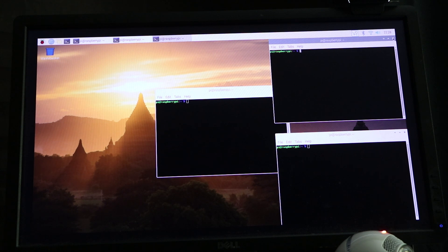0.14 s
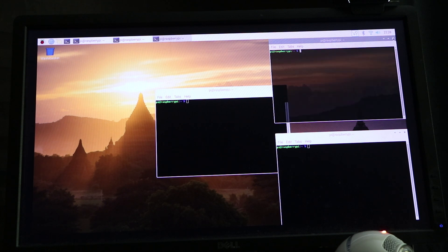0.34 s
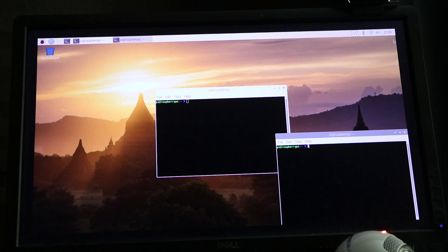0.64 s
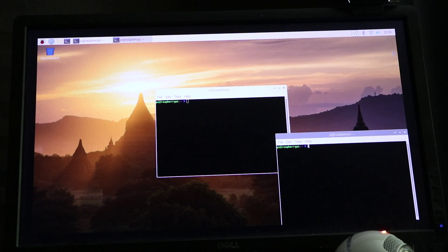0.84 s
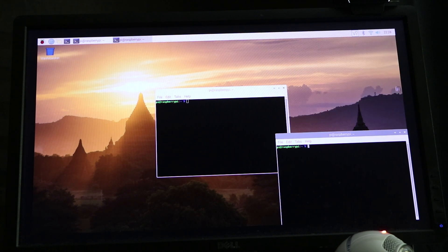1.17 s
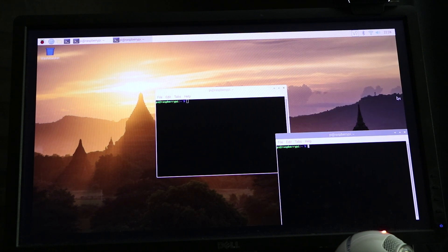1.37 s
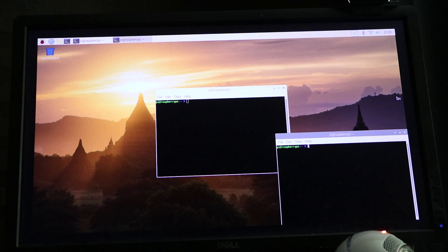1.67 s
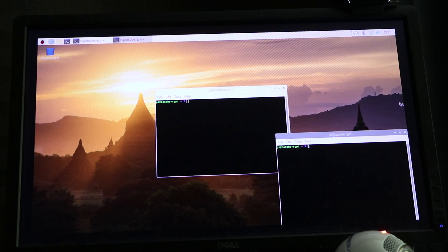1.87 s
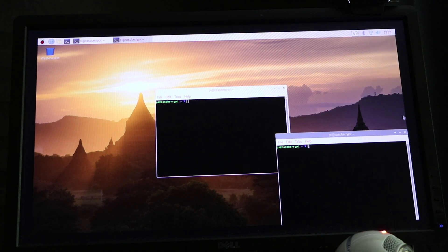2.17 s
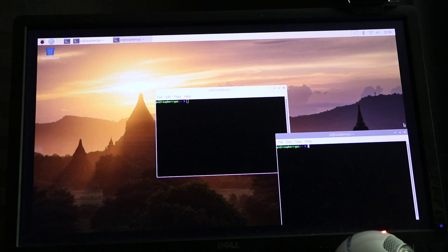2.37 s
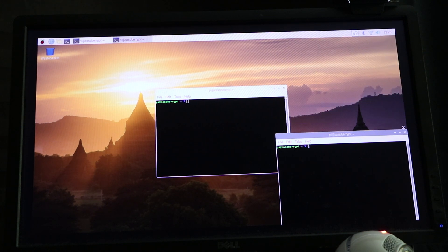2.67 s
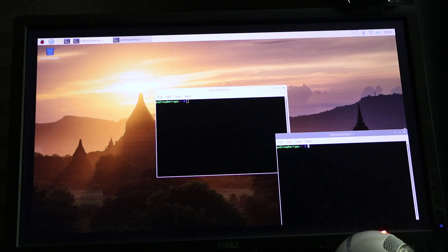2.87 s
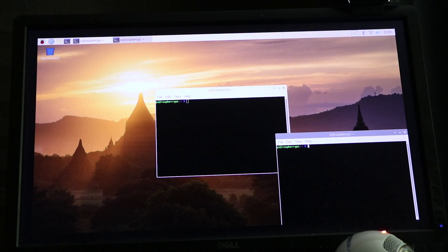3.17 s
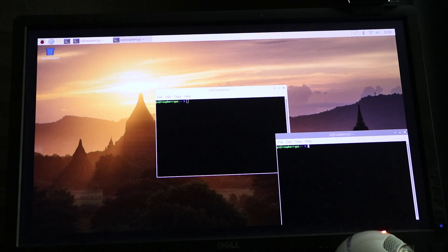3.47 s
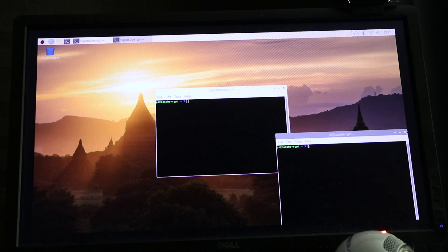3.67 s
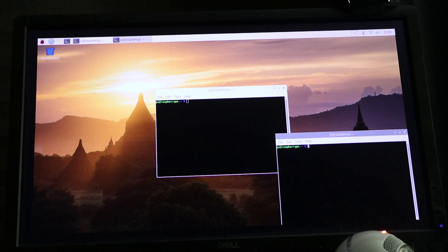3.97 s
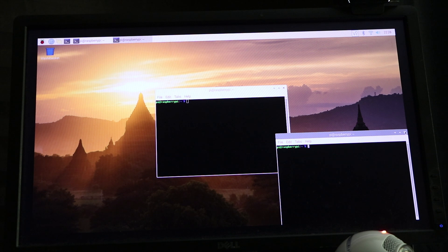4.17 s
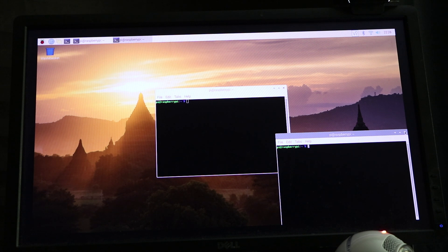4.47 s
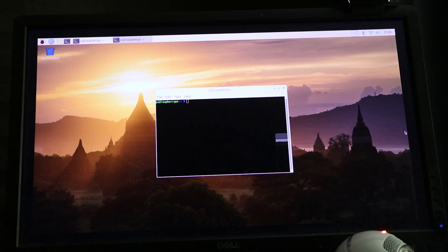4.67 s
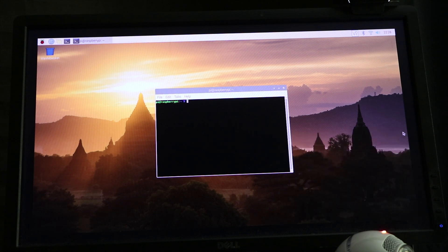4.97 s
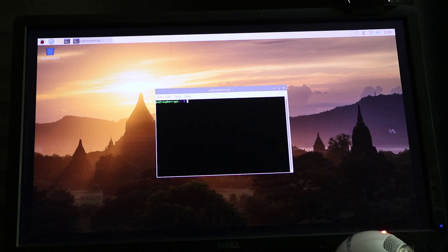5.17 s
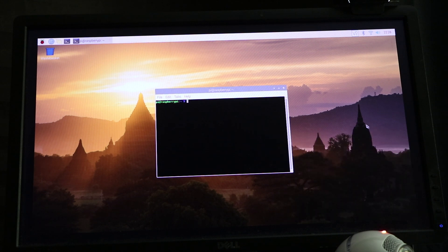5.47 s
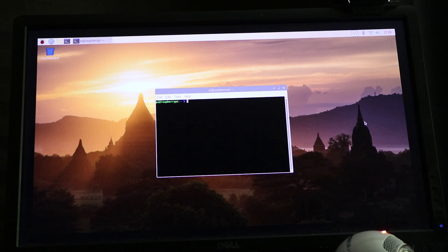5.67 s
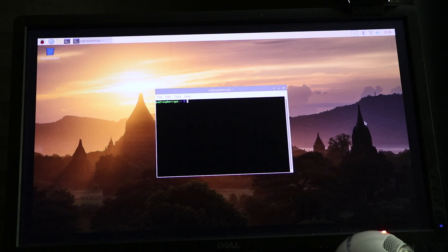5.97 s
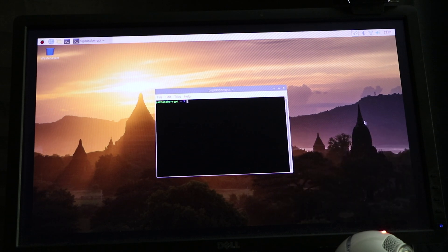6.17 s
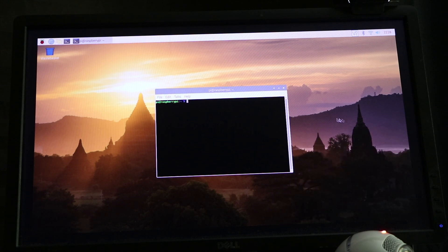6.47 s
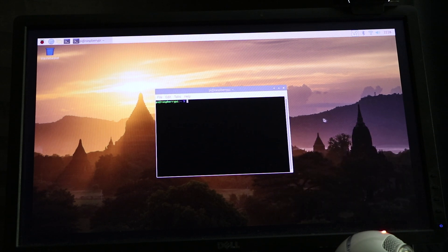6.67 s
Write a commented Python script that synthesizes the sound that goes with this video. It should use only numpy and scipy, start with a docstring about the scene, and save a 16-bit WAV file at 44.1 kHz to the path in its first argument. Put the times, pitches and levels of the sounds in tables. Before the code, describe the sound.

A computer mouse clicks, slides and clatters lightly on a desk, over a soft fan hum in a quiet room.

```python
"""A desk in a quiet room, with a computer mouse a little right of the microphones.
Its button is pressed and let go twice, each snap ringing the switch and button. In between, the mouse
slides on rubbing feet, is lifted and clatters back: the desk top thuds, the hollow shell clacks and its
edge ticks. Later it slides and bumps again. A fan hums softly throughout, over a faint, deep rumble."""
import sys
import numpy as np
from scipy import signal
from scipy.fft import rfft, irfft
from scipy.io import wavfile
from scipy.ndimage import uniform_filter1d

SR = 44100
rng = np.random.default_rng(int(sys.argv[2]) if len(sys.argv) > 2 else 0)


def bounce(signal):
    """Save signal as a 16-bit WAV file at the path given by the first command-line argument."""
    frames = np.transpose(np.atleast_2d(signal))
    limited = np.clip(frames, -1, 1)
    pcm = np.round(limited * 32767).astype(np.int16)
    wavfile.write(sys.argv[1], SR, pcm)


N = 300938


def amp(db):
    """Decibels to gain."""
    return 10 ** (np.asarray(db) / 20)


def unit_rms(x):
    """Scales to rms 1."""
    return x / np.sqrt(np.mean(x ** 2) + 1e-20)


def unit_hit(x):
    """Scales a hit to the energy of 10 ms at rms 1."""
    return unit_rms(x) * np.sqrt(0.01 * SR / x.shape[-1])


def curve_at(points, hz):
    """Reads (Hz, value) points on a log-frequency axis."""
    point_hz, value = np.transpose(points)
    return np.interp(np.log(hz + 1), np.log(point_hz), value)


def add(mix, start_s, sound):
    """Lays a sound into the mix."""
    part = mix[..., max(round(start_s * SR), 0):][..., :sound.shape[-1]]
    part += sound[..., :part.shape[-1]]


def colour(x, spectrum, size=4096):
    """Minimum-phase EQ through (Hz, dB) points: nothing sounds before the attack."""
    log_gain = np.log(amp(curve_at(spectrum, abs(np.fft.fftfreq(size, 1 / SR)))))
    response = np.exp(np.conj(signal.hilbert(log_gain)))
    taps = np.fft.ifft(response).real[:size // 2]
    return signal.fftconvolve(x, taps[None], axes=1)[:, :x.shape[1]]


def arches(rows):
    """Turns each row of start, length and dB into a half-sine swell from 0 to 1 and back, and its dB."""
    t = np.arange(N) / SR
    return [(np.sin(np.pi * np.clip((t - start) / length, 0, 1)).clip(0), db)
            for start, length, db in rows]


def diffuse(size):
    """Flat noise at two close microphones: alike in the low mids, unrelated in the treble."""
    # Each row: frequency in Hz, correlation of left and right.
    likeness = [(30, -0.05), (130, 0.97), (290, 0.82), (640, 0.82), (1400, 0.31), (2600, 0), (16000, 0)]
    hz = np.fft.rfftfreq(size, 1 / SR)
    left, unrelated = np.exp(2j * np.pi * rng.random((2, len(hz))))
    shared = np.clip(curve_at(likeness, hz), -1, 1)
    right = shared * left + np.sqrt(1 - shared ** 2) * unrelated
    return unit_rms(irfft(np.array([left, right]), size))


def rumble(floor_db=-78):
    """A faint, deep bed of noise that swells now and then."""
    # Each row: frequency in Hz, gain in dB.
    rumble_eq = [(15, -22), (30, -10), (42, -4), (60, -12), (120, -48), (400, -68)]
    # Each row: start in seconds, length in seconds, peak level in dB.
    swells = [(.2, .45, -67), (2.95, .35, -64), (3.6, 0.86, -62)]
    level = amp(floor_db) + sum(amp(db) * arch for arch, db in arches(swells))
    return unit_rms(colour(diffuse(N), rumble_eq, size=16384)) * level


def fan(air_db=-49, waver_hz=5, left_db=0.3, right_db=-0.97):
    """A fan's steady rush of air, with a few faint, wavering tones."""
    # Each row: frequency in Hz, gain in dB.
    air_eq = [(25, -13.5), (70, -10), (140, -1), (230, -3), (330, -3.5), (420, -3), (750, -6.5),
              (950, -8.5), (1300, -11), (2000, -19.5), (3200, -23), (4900, -30), (6800, -26),
              (10400, -26.5), (16000, -36.5)]
    # Each row: pitch in Hz, level in dB.
    tones = [(226, -63), (296, -65), (420, -63), (737.5, -60), (10492, -100)]
    out = amp(air_db) * unit_rms(colour(diffuse(N), air_eq))
    for hz, db in tones:
        drift = waver_hz * unit_rms(uniform_filter1d(rng.standard_normal(N), size=2000))
        out += amp(db) * np.sqrt(2) * np.sin(2 * np.pi * np.cumsum(hz + drift) / SR)
    return out * amp([[left_db], [right_db]])


def reverb_tail(build_s=0.0057, size=26000):
    """The room's diffuse tail builds quickly and dies away band by band."""
    # Each row: frequency in Hz, seconds to fall 60 dB.
    decay_times = [(100, 0.15), (300, 0.39), (1000, 0.3), (3000, 0.26), (8000, 0.21), (15000, 0.24)]
    hz, t, bands = signal.stft(diffuse(size), SR, nperseg=256)
    decay = amp(-60 * t / curve_at(decay_times, hz)[:, None])
    tail = signal.istft(bands * decay, SR, nperseg=256)[1]
    tail *= 1 - np.exp(-(np.arange(tail.shape[1]) / SR / build_s) ** 2)
    return tail / np.linalg.norm(tail[0])


def room(dry, echo_db, wet_db=-6, tails=3, crossfade_hz=23):
    """Direct sound, echoes off nearby surfaces and a short tail whose paths change from blow to blow."""
    # Each row: delay in seconds, left gain, right gain.
    echoes = [(0.011, .22, 0.12), (0.0053, 0.11, .16), (0.0119, 0.22, 0.2), (0.0118, 0.27, 0.11)]
    out = dry.copy()
    for delay, left, right in echoes:
        add(out, delay, amp(echo_db) * np.array([[left], [right]]) * dry[1])
    turns = crossfade_hz * np.arange(N) / SR
    for k in range(tails):
        send = np.sqrt(2 / tails) * np.cos(np.pi * (turns + k / tails))  # equal-power crossfade
        out += amp(wet_db) * signal.fftconvolve(dry[1:] * send, reverb_tail(), axes=1)[:, :N]
    return out


def from_the_right(x, lag_s=0.00019):
    """Sound reaches the left microphone later, its treble shaded by the microphones' housing."""
    # Each row: frequency in Hz, left minus right in dB.
    shadow = [(100, -1.5), (380, 2.5), (1200, 0.5), (2400, -4), (4400, -4), (15000, -2)]
    hz = np.fft.rfftfreq(N, 1 / SR)
    balance = amp(curve_at(shadow, hz) / 2)
    left = balance * np.exp(-2j * np.pi * hz * lag_s)
    return irfft(rfft(x) * np.array([left, 1 / balance]), N)


def slide(speed_power=0.97, grain_db=1.0, fizz_db=-5, fizz_growth=1.5, brisk_db=-54):
    """The hand pushes the mouse: tiny slips of its feet sound desk and shell; brisk strokes add fizz."""
    # Each row: start in seconds, length in seconds, rub level at full speed in dB.
    strokes = [(.6, .62, -49.5), (1.09, 0.27, -58), (5.02, 0.45, -55.5), (5.59, 0.16, -57.5),
               (6.02, 0.28, -60), (6.26, 0.44, -51), (6.66, 0.16, -54.5)]
    # The low rub and the bright fizz. Each row: frequency in Hz, gain in dB.
    rub_eq = [(60, -14), (150, 1), (300, 9), (460, 13.5), (650, 1), (1400, 3), (2200, 0), (3100, 0.5),
              (3800, -4.5), (4800, -19), (8000, -17), (16000, -25)]
    fizz_eq = [(1000, -25), (2500, 9), (4000, 5), (5200, 0), (7500, 2), (10000, -0.5), (12500, -6.5),
               (16000, -12)]
    rub_level = sum(amp(db) * speed ** speed_power for speed, db in arches(strokes))
    fizz_level = amp(brisk_db + fizz_db) * (rub_level / amp(brisk_db)) ** fizz_growth
    grain = amp(grain_db * unit_rms(uniform_filter1d(rng.standard_normal(N), size=120)))
    rub = unit_rms(colour(diffuse(N) * grain, rub_eq))
    fizz = unit_rms(colour(diffuse(N) * grain, fizz_eq))
    return rub * rub_level + fizz * fizz_level


def burst(t60, scatter, rightward_db=0, size=8192):
    """A sharp impulse, which can lean to the right, followed by a dense, dying shudder."""
    t = np.arange(size) / SR
    shudder = unit_hit(diffuse(size) * amp(-60 * t / t60))
    impulse = (t == 0) * amp([[-rightward_db], [0]])
    return unit_hit(impulse) + scatter * shudder


def softened(spectrum, corner_hz):
    """A contact of finite length dulls a spectrum above its corner."""
    return [(hz, db - 10 * np.log10(1 + (hz / corner_hz) ** 4)) for hz, db in spectrum]


def touches(rebounds=5, gap_s=0.0028, unevenness=0.3, rebound_db=-4):
    """The mouse lands; some landings rattle from foot to foot, fading and rocking the desk either way."""
    # Each row: start in seconds, strength in dB, hardness as a corner in Hz, tick strength in dB,
    # tick corner in Hz, seconds for the rattle to fall 20 dB and stop (zero or less: no rattle).
    landings = [(1.2417, -39, 630, -54, 11000, -0.03), (1.258, -37.5, 430, -63.5, 9000, -0.2),
                (1.69, -31.5, 1720, -37.5, 6000, 0.55), (1.6976, -31, 1400, -37, 8000, -0.08),
                (1.7055, -24.5, 795, -35, 12000, -0.04), (1.7124, -18, 930, -25, 16000, 0),
                (1.7176, -22.5, 930, -36, 12000, -0.28), (1.797, -24.5, 840, -27, 5950, -0.09),
                (1.8007, -20.5, 660, -42, 10000, -0.02), (1.8031, -21.5, 700, -50, 8000, 0.05),
                (5.255, -42, 380, -72, 8000, -0.6), (5.9834, -36.5, 670, -43, 5000, .005),
                (5.989, -27.5, 386, -51, 2580, 0.04), (6.52, -36, 470, -63, 6000, -0.1),
                (6.5594, -44, 398, -45.5, 16000, .002), (6.582, -36.5, 350, -75, 8000, -0.1),
                (6.799, -42, 414, -74, 8000, -0.1)]
    for start, db, hard_hz, tick_db, tick_hz, rattle_s in landings:
        yield start, 1, db, hard_hz, tick_db, tick_hz
        delays = np.cumsum(gap_s * np.exp(unevenness * rng.standard_normal(rebounds)))
        for delay, sign in zip(delays, rng.choice([-1, 1], rebounds)):
            if delay < rattle_s:
                fade_db = rebound_db - 20 * delay / rattle_s
                yield start + delay, sign, db + fade_db, hard_hz, tick_db + fade_db, tick_hz


def knocks(ring_db=-5.5, ring_left_db=2.5, firm_hz=700, clack_db_per_octave=6.5, size=22050):
    """Each touch thuds and rings in the desk top, clacks in the hollow shell and ticks at its edge."""
    # The desk top's modes. Each row: pitch in Hz, level in dB, seconds to fall 60 dB.
    desk = [(113.4, -25, 0.27), (144.2, -12.5, 0.44), (189.2, -4.5, 0.32), (240, 2.5, 0.27),
            (304.2, -3.5, 0.29), (352.5, -7, 0.39), (429, -8, 0.12), (611, 0.5, 0.27), (724, 2, 0.18),
            (881, -3, 0.14), (1284, -6, 0.38), (1780, -6, 0.28)]
    # The three layers of a knock. Each row: frequency in Hz, gain in dB.
    thud_eq = [(30, -48), (80, -19), (150, -9.5), (250, 2.5), (450, 2), (780, -2.5), (1050, -10.5),
               (1600, -8), (4000, -49)]
    clack_eq = [(200, -84), (700, -12), (1250, 3.5), (1550, -2.5), (2200, 2), (2700, 0.5), (3900, -4),
                (4900, -17.5), (9000, -24), (16000, -57)]
    tick_eq = [(500, -64), (2500, -19), (4600, -1), (5700, -1), (8000, -0.5), (10500, -6), (12500, -9),
               (16000, -15)]
    out, t = np.zeros((2, N)), np.arange(size) / SR
    attack = 1 - np.exp(-t / 0.0035)
    modes = [amp(-60 * t / t60) * np.sin(2 * np.pi * hz * t) * attack for hz, _, t60 in desk]
    mode_levels = [(hz, db) for hz, db, _ in desk]
    for start, sign, blow_db, hard_hz, tick_db, tick_hz in touches():
        # A soft contact lasts longer, smears the attack and leaves the higher modes at rest.
        ring = sum(amp(db) * mode for (_, db), mode in zip(softened(mode_levels, hard_hz), modes))
        thud = colour(burst(t60=0.074, scatter=(firm_hz / hard_hz) ** 2), softened(thud_eq, hard_hz))
        clack = colour(burst(t60=0.063, scatter=1.8, rightward_db=9), clack_eq)
        tick = colour(burst(t60=0.041, scatter=1.35, rightward_db=9), softened(tick_eq, tick_hz))
        clack_db = blow_db + clack_db_per_octave * np.log2(hard_hz / firm_hz)  # hard blows clack more
        add(out, start, sign * amp(blow_db + ring_db) * unit_hit(ring) * amp([[ring_left_db], [0]]))
        for layer, db in ((thud, blow_db - 1), (clack, clack_db - 10.5), (tick, tick_db - 6)):
            add(out, start, sign * amp(db) * unit_hit(layer))
    return out


def button(snaps, modes, chatter_t60=0.015, chatter=3.6, left_db=-6, right_db=2, size=2048):
    """The switch snaps over and the button hits its stop; both rattle the same small resonances."""
    out, t = np.zeros((2, N)), np.arange(size) / SR
    ring = np.zeros(size)
    for k, (hz, width_hz, db) in enumerate(modes):
        envelope = amp(db) * np.sqrt(width_hz) * np.exp(-np.pi * width_hz * t)
        ring += (-1) ** k * envelope * np.sin(2 * np.pi * hz * t)
    for start, db, stop_delay, stop_db in snaps:
        for contact_s, contact_db in ((start, db), (start + stop_delay, db + stop_db)):
            snap = signal.fftconvolve(burst(chatter_t60, chatter), ring[None], axes=1)
            add(out, contact_s, amp(contact_db) * unit_hit(snap))
    return out * amp([[left_db], [right_db]])


def clicks():
    """The button goes down and springs back, ringing differently when held and when free."""
    # Each row: start in seconds, strength in dB, delay of the second contact in seconds,
    # its level against the first in dB.
    presses = [(0.0402, -37.5, 0.0028, -5.5), (4.3602, -40, 0.0021, 0)]
    releases = [(0.2657, -34, .0022, -2), (4.5702, -35.5, 0.0036, -1.1)]
    # Switch and button resonances. Each row: pitch in Hz, bandwidth in Hz, level in dB.
    held_modes = [(2300, 1200, -14), (4000, 750, -6.5), (5260, 670, -6.5), (6600, 540, 2), (7400, 760, 3.5),
                  (10440, 610, 0.5), (12900, 1200, -8), (15000, 900, -7)]
    free_modes = [(3130, 910, -15), (5670, 1100, -9.5), (7480, 820, -3), (8660, 490, -0.5),
                  (10200, 1300, -2), (11330, 830, -7), (13600, 1000, -16), (15100, 800, -20)]
    return button(presses, held_modes) + button(releases, free_modes)


def scene():
    """Clicks and knocks in the room and dry slides, all to the right, over the fan and the rumble."""
    mouse = room(clicks(), echo_db=-5) * amp(-3) + room(knocks(), echo_db=-9) + slide()
    return from_the_right(mouse) + fan() + rumble()


def record(dry):
    """A steep low-pass trims the top end at 16 kHz."""
    lowpass = signal.firwin(401, 16000, window=("kaiser", 9), fs=SR)
    return signal.oaconvolve(dry, lowpass[None], "same")


dry = scene()
out = record(dry)
bounce(out)
```